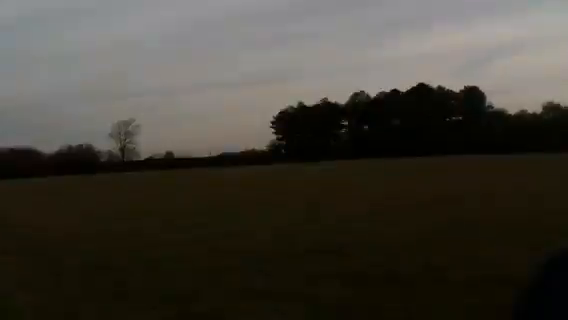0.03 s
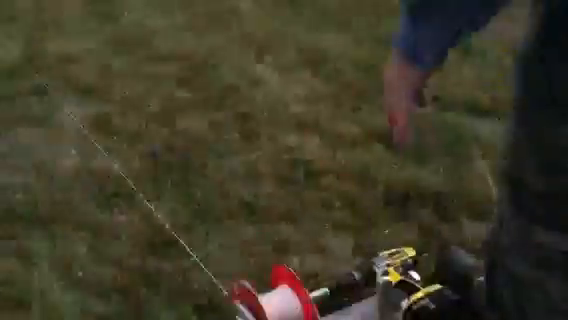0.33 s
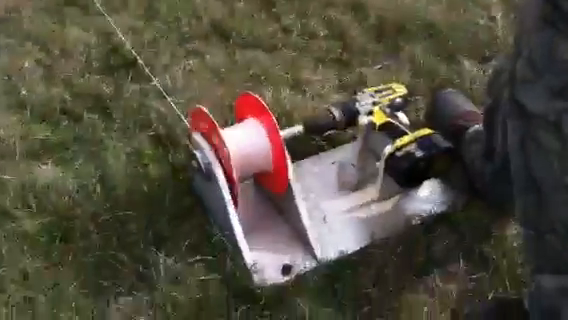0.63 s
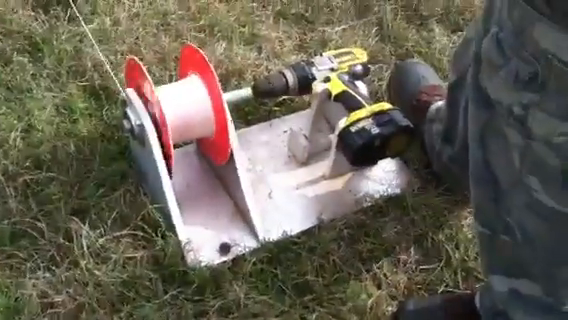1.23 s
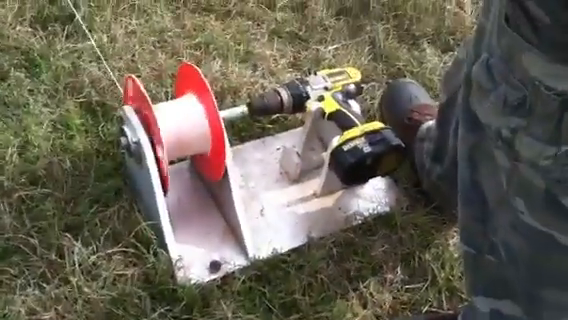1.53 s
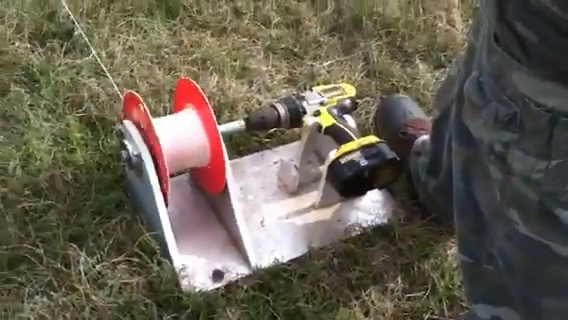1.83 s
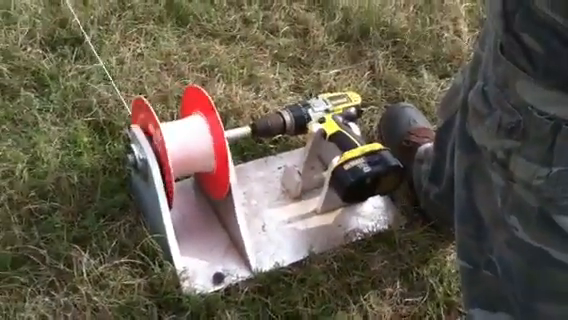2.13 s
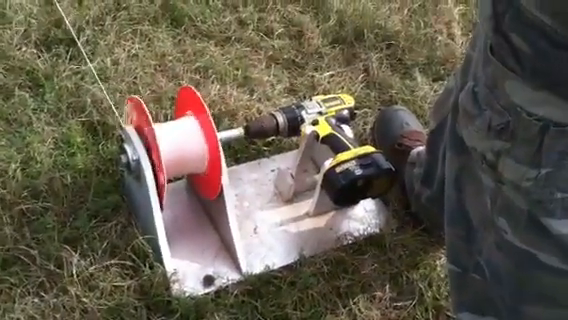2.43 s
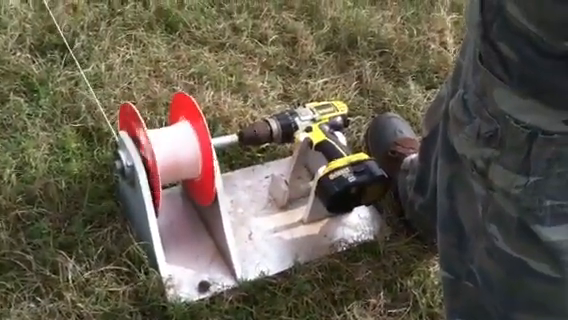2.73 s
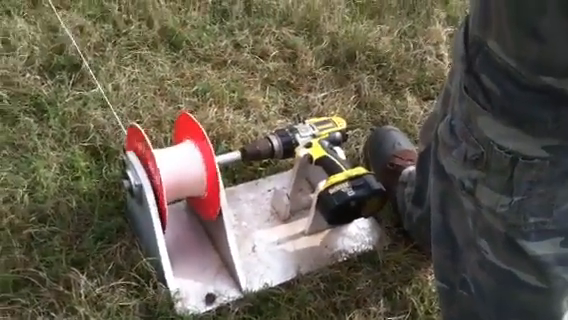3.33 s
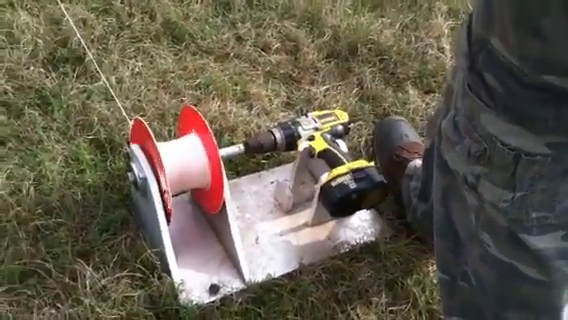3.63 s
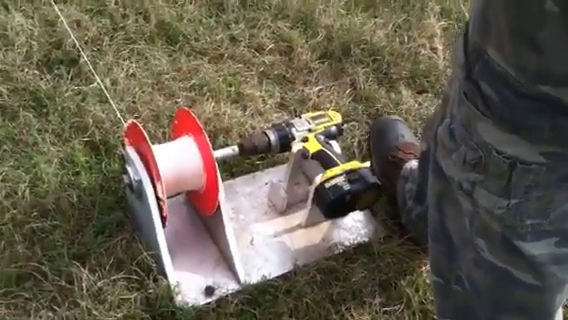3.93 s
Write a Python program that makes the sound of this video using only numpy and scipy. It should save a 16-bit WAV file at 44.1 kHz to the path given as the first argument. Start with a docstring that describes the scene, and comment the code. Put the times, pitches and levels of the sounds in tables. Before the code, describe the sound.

A cordless drill runs from the start with a gritty hiss and high whine, growing louder over the first second. The spool it turns knocks rapidly on a metal stand, chattering more loosely from about 1.5 seconds, with a few sharp line ticks. At 3.4 seconds the drill quickly winds down, falling in pitch. The spool settles with a faint scrape and clicks around 3.7 seconds, in quiet outdoor air.

```python
"""A cordless drill spins a line spool on a metal stand, out in an open field.
The microphone turns to the drive in the first second: its gears hiss and whine, and the spool
knocks round every turn, later chattering in its bearing. The line ticks while the spool runs.
The trigger is let go, the drive runs down, and the spool settles with a scrape and faint clicks."""
import sys
import numpy as np
from scipy import signal
from scipy.fft import rfft, irfft
from scipy.io import wavfile

SR = 44100
rng = np.random.default_rng(int(sys.argv[2]) if len(sys.argv) > 2 else 0)


def int16_out(signal):
    """Quantize to a 16-bit WAV file."""
    q = np.round(np.clip(np.atleast_2d(signal).T, -1, 1) * 32767)
    wavfile.write(sys.argv[1], SR, q.astype(np.int16))


N = 176400
FULL_TURNS_PER_S, RELEASE_S = 19.4, 3.41  # speed 1 of the spool; the trigger is let go
TONE_WAVER = .33

# loudness of the drive as the microphone turns to it: time_s, gain_db
MIC_AIM = [(0, -5), (.25, -2.5), (.45, -1.5), (.9, .5), (1.6, 1), (2.5, 0.5), (3.4, 0)]
# how loosely the spool runs: time_s, looseness (0-1)
LOOSENESS = [(0, 0), (1.15, 0), (1.7, 0.85), (2.3, 0.85), (2.75, 0.77), (3.4, 0.62)]


def gear_hiss(speed, turns):
    """Gritty hiss of teeth and brushes, throbbing with spool and motor and ringing the housing."""
    # spectrum of teeth and brushes: frequency_hz, relative_db
    spectrum = [(100, -20), (170, -5.5), (235, -6.5), (300, -4), (500, -1), (750, 3), (1100, -3.5),
                (1700, 1.5), (2300, 1.5), (3000, -1), (3800, -2), (4300, 1), (5500, -2), (7700, 0.5),
                (8700, -1.5), (10100, -5), (11000, -6.5), (13000, -13.5), (14200, -22.5), (15500, -47)]
    # housing resonances: pitch_hz, width_hz, tight_spool_db, loose_spool_db
    housing = [(2550, 90, -45.5, -49), (2416, 690, -45.5, -38), (2920, 1000, -40.5, -49),
               (3345, 70, -44.5, -60), (3750, 740, -50.5, -41), (7520, 310, -47, -46),
               (10060, 270, -49, -43.5)]
    grains_per_s, grit_share, motor_ratio = 3500, .43, 11
    quiet_speed = .08  # below this the teeth roll silently
    grit = rng.standard_normal(N) * (rng.random(N) < grains_per_s * speed / SR)
    grit *= amp(1.15 * np.minimum(rng.exponential(1, N), 3))
    angle = 2 * np.pi * turns
    throb = 1 + .061 * np.cos(angle) + .073 * np.cos(4 * angle - .8) + .075 * np.cos(motor_ratio * angle)
    friction = np.sqrt(grit_share) * unit(grit) + np.sqrt(1 - grit_share) * rng.standard_normal(N)
    hiss = amp(-30 + curve(MIC_AIM)) * colour(throb * friction, spectrum)
    loose = curve(LOOSENESS)
    for hz, width, tight_db, loose_db in housing:
        gain = amp(tight_db + (loose_db - tight_db) * loose)
        hiss += gain * resonate(throb * rng.standard_normal(N), hz, width)
    return hiss * np.maximum((speed - quiet_speed) / (1 - quiet_speed), 0) ** 1.13


def powered_whine(speed, turns):
    """Meshing teeth sing at multiples of the spool's rate; resonances squeal, two varying with load."""
    # gear tones: cycles_per_turn
    orders = [31, 169, 319, 330, 341]
    # strength of each gear tone: level_db
    levels = [-50, -48.5, -49.5, -37.3, -52]
    # resonances that sing under power: pitch_hz, width_hz, level_db, load_db (per turn/s lost)
    squeals = [(3310, 120, -49.5, -4.5), (6370, 680, -40.5, 0), (9350, 330, -44, 6.5)]
    main_order, rate = 330, FULL_TURNS_PER_S * speed
    tones = 0
    for order, db in zip(orders, levels):
        waver = 1 + TONE_WAVER * drift(45)
        jitter = .35 * order / main_order * drift(25)
        tones += amp(db) * unit(waver * np.sin(2 * np.pi * order * turns + jitter))
    rough_edge = amp(-40) * noise_band(main_order * rate, width_hz=370)
    load = np.clip(FULL_TURNS_PER_S - rate, -.2, .6)
    squeal = sum(amp(db + load_db * load) * noise_band(hz, width) for hz, width, db, load_db in squeals)
    return tones + rough_edge + squeal


def coasting_whine(speed):
    """Two gear tones fall with the speed, the lower through the ring of the rattling stand."""
    rate = FULL_TURNS_PER_S * speed
    mesh_hz, buzz_hz = 75 * rate, 157 * rate
    stand_hz, half_width_hz = 720, 170
    stand_gain = 1 / np.hypot(1, (mesh_hz - stand_hz) / half_width_hz)
    mesh = amp(-39.5) * stand_gain * glide(mesh_hz, width_hz=75)
    buzz = amp(-39.5) * speed ** 2 * glide(buzz_hz, width_hz=110)
    rattle = amp(-44) * noise_band(890, width_hz=260)
    return (mesh + buzz + rattle) * speed ** .5


def spool_knocks(speed, turns):
    """The spool hits its bearing at the same places in every turn, ringing stand, bearing and flange."""
    # contacts in each turn: place_turns, thud_db, clack_db, ring_db, chatter_db (added when loose)
    contacts = [(0, 4.9, .2, 0, -1.8), (.074, -10, -11.3, -10, 0), (.272, -10, -7.2, -11, 5.5),
                (.358, -7.3, -13.4, -10.5, 4.4), (.527, -15.4, -5, -19, 7.6), (.754, -18, -3.5, -19, 5),
                (.872, -2.5, -15.2, -14, 0), (.948, -16, -16, -8, -6.8)]
    # moments when the flange is struck harder or softer: time_s, gain_db
    accents = [(.318, -5), (1.55, 3), (2.163, 3), (2.317, -5), (2.421, 4), (2.473, 2), (2.526, -3),
               (2.79, 3), (2.845, -3), (2.898, 4.5), (3.265, -3), (3.422, 5)]
    # strength of the flange ring: time_s, gain_db
    ring_level = [(0, 1.5), (.375, 1.5), (.41, 5.5), (.7, 4.5), (1.3, 3.5), (1.42, 0), (1.75, -1.5),
                  (2, -.5), (3.4, -.5)]
    # modes of the metal stand: pitch_hz, relative_db, t60_s
    stand = [(157.5, -12.5, 0.055), (194.5, -10, 0.15), (267.4, -3.5, 0.1), (369, 8.5, 0.082),
             (431, 0, .065)]
    # modes of the bearing: pitch_hz, relative_db, t60_s
    bearing = [(608.6, 0.5, 0.047), (693, 2, 0.028), (770, -1.5, 0.037), (818, -7, 0.044),
               (974, -13, 0.037)]
    # modes of the spool flange: pitch_hz, relative_db, t60_s
    flange = [(1448, 6.5, 0.045), (1502, 3.5, 0.029), (1648, -3.5, 0.047), (2230, 0, 0.023),
              (2700, 4.5, 0.0054)]
    scuff_s, jitter_s, accent_reach_s = .002, .00002, .012
    blows, loose, t = np.zeros((3, N)), curve(LOOSENESS), np.arange(600) / SR
    for place, thud_db, clack_db, ring_db, chatter_db in contacts:
        for i in np.flatnonzero(np.diff(np.floor(turns - place)) > 0):
            start_s = i / SR
            spread_db, late, wobble_db = rng.standard_normal(size=3)
            blow = rng.standard_normal(len(t)) * np.exp(-t / scuff_s)
            blow *= .17 / np.linalg.norm(blow)
            blow[0] += 1  # a sharp hit leads the faint scuff
            accent_db = sum(db for s, db in accents if abs(s - start_s) < accent_reach_s)
            flange_db = ring_db + accent_db + wobble_db * loose[i]
            slack_db = -5 * (start_s > RELEASE_S)
            force_db = chatter_db * loose[i] + slack_db + spread_db
            gains = speed[i] ** 2 * amp(np.array([thud_db, clack_db, flange_db]) + force_db)
            add(blows, start_s + jitter_s * late, gains[:, None] * blow)
    thud = amp(-41) * ring(blows[0], stand)
    clack = amp(-38.5) * ring(blows[1], bearing)
    return thud + clack + amp(-38.5 + curve(ring_level)) * ring(blows[2], flange)


def flange_rub(speed):
    """The flange rubs lightly, less once the spool runs loose."""
    return amp(-41 - 2.5 * curve(LOOSENESS)) * speed ** 2 * noise_band(1472, width_hz=85)


def settling_scrape():
    """The spool scrapes as it rocks back to rest."""
    # swell of the scrape: time_s, level_db
    swell = [(3.635, -64), (3.668, -55), (3.735, -56), (3.76, -58), (3.78, -78)]
    # spectrum of the scrape: frequency_hz, relative_db
    spectrum = [(59, -49.5), (100, -20), (452, -6.5), (824, -4.5), (1080, -17), (1810, -13.5), (3230, -24),
                (4400, -21.5), (14000, -42.5)]
    return amp(curve(swell)) * colour(rng.standard_normal(N), spectrum)


def ticks_and_clicks():
    """The line ticks while the spool runs; then the spool clicks faintly as it settles."""
    # line ticks and settling clicks: start_s, level_db, decay_s, centre_hz
    events = [(.205, -29, .006, 9000), (1.3088, -19, .002, 8000), (1.638, -24, .004, 7000),
              (2.872, -24, .003, 3000), (3.713, -51, .005, 2400), (3.723, -53, .004, 6000),
              (3.735, -46.5, .004, 2400), (3.753, -54, .006, 3800)]
    ticks, t = np.zeros(N), np.arange(2000) / SR
    for start_s, db, decay_s, hz in events:
        add(ticks, start_s, amp(db) * np.exp(-t / decay_s) * noise_band(hz, .76 * hz)[-len(t):])
    return ticks


def field_air():
    """The faint, steady background of the open field."""
    # spectrum of the air: frequency_hz, relative_db
    spectrum = [(15, -57), (25, -11), (33, -28.5), (59, -20), (142, -3.5), (415, -19), (1240, -16),
                (2930, -27.5), (10600, -37), (13500, -48), (15000, -46)]
    return amp(-65) * colour(rng.standard_normal(N), spectrum)


def amp(db):
    """Decibels to gain."""
    return 10 ** (np.asarray(db) / 20)


def unit(x):
    """Scales to rms 1."""
    return x / np.sqrt(np.mean(x ** 2) + 1e-20)


def curve(points):
    """Joins (s, value) points, one value per sample."""
    return np.interp(np.arange(N) / SR, *np.transpose(points))


def colour(x, points):
    """Filters x by a curve of (Hz, dB) points, at rms 1."""
    hz, db = np.transpose(points)
    gain = amp(np.interp(np.log(np.fft.rfftfreq(N, 1 / SR) + 1), np.log(hz), db))
    return unit(irfft(rfft(x) * gain, N))


def drift(hz):
    """Random wander, mostly slower than hz, at rms 1."""
    return unit(irfft(rfft(rng.standard_normal(N)) / (1 + (np.fft.rfftfreq(N, 1 / SR) / hz) ** 2), N))


def resonate(x, hz, width_hz):
    """Passes x through a steep resonance that follows hz, at rms 1."""
    carrier = np.exp(2j * np.pi * np.cumsum(hz * np.ones(N)) / SR)
    pole = np.exp(-np.pi * width_hz / SR)
    return unit((carrier * signal.lfilter([1], [1, -2 * pole, pole * pole], x / carrier)).real)


def noise_band(hz, width_hz):
    """Noise around hz, at rms 1."""
    return resonate(rng.standard_normal(N), hz, width_hz)


def glide(hz, width_hz):
    """A rough tone that follows hz, at rms 1."""
    waver = 1 + TONE_WAVER * drift(60)
    return unit(waver * np.sin(2 * np.pi * np.cumsum(hz + width_hz / 2 * drift(208)) / SR))


def ring(blows, modes):
    """Blows excite decaying modes, at rms 1."""
    t = np.arange(SR // 8) / SR
    body = sum((-1) ** k * amp(db - 60 * t / t60) * np.sin(2 * np.pi * hz * t)
               for k, (hz, db, t60) in enumerate(modes))
    return unit(signal.oaconvolve(blows, body)[:N])


def add(mix, s, sound):
    """Mixes a sound in at time s."""
    part = mix[..., max(round(s * SR), 0):][..., :sound.shape[-1]]
    part += sound[..., :part.shape[-1]]


def scene():
    """One speed drives gears and spool, heard in mono over the quiet air of the field."""
    # spool speed under the changing pull of the line: time_s, turns_per_s
    spool_rate = [(0, 20.06), (.2, 19.36), (.35, 20), (.52, 20.21), (.75, 19.97), (1, 19.39), (1.18, 18.88),
                  (1.32, 18.64), (1.48, 19.3), (1.75, 19.48), (1.98, 19.62), (2.2, 19.38), (2.45, 19.24),
                  (2.7, 18.77), (2.88, 18.56), (3.05, 19.06), (3.25, 19.15), (3.41, 19.39), (3.645, 0)]
    first_knock_s, lowest_radiated_hz = .008, 114
    rate = curve(spool_rate)
    speed = rate / FULL_TURNS_PER_S
    turns = np.cumsum(rate) / SR - first_knock_s * FULL_TURNS_PER_S
    powered = np.exp(-np.maximum(np.arange(N) / SR - RELEASE_S, 0) / .0035)
    hiss = gear_hiss(speed, turns)
    whine = powered * powered_whine(speed, turns) + (1 - powered) * coasting_whine(speed)
    spool = spool_knocks(speed, turns) + flange_rub(speed)
    machine = hiss + amp(curve(MIC_AIM)) * (whine + spool) + settling_scrape() + ticks_and_clicks()
    low_cut = signal.butter(6, lowest_radiated_hz, "high", fs=SR, output="sos")
    return (signal.sosfilt(low_cut, machine) + field_air())[None]


def record(dry):
    """The recorder cuts the treble above 15.3 kHz."""
    return signal.oaconvolve(dry, signal.firwin(511, 15300, window=("kaiser", 9), fs=SR)[None], "same")


dry = scene()
out = record(dry)
int16_out(out)
```